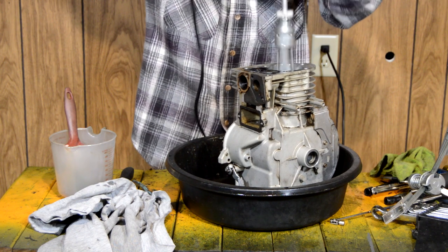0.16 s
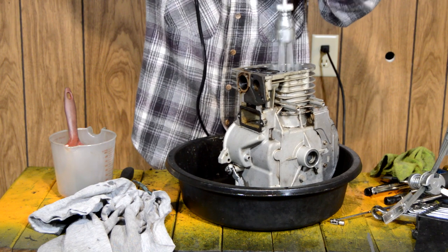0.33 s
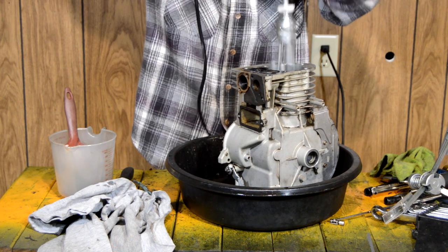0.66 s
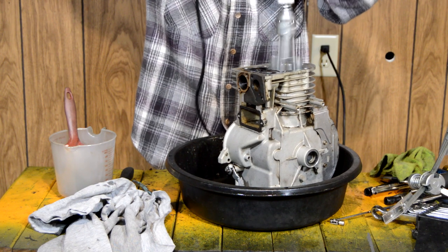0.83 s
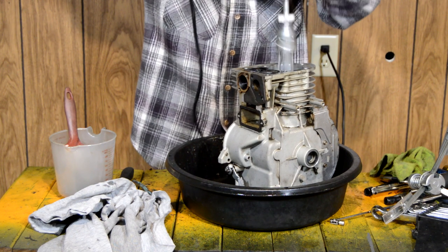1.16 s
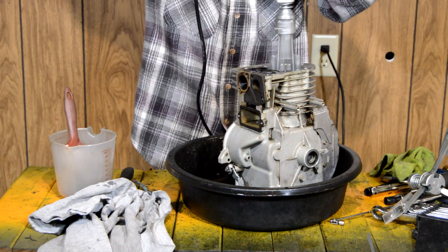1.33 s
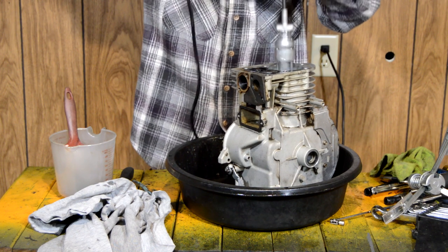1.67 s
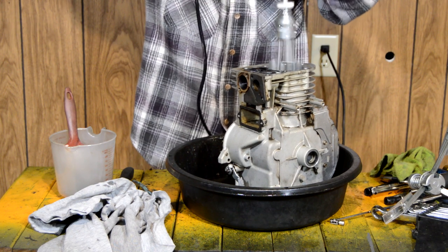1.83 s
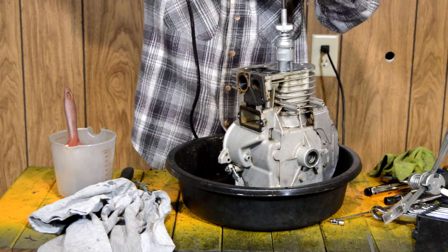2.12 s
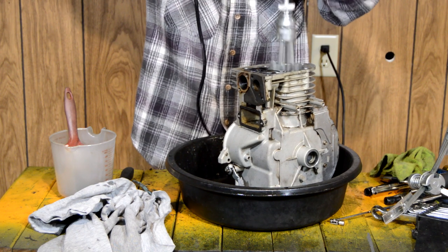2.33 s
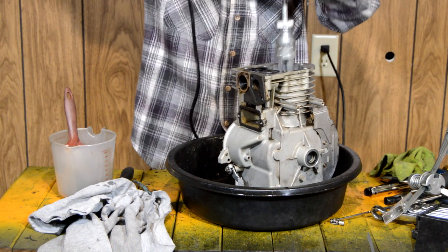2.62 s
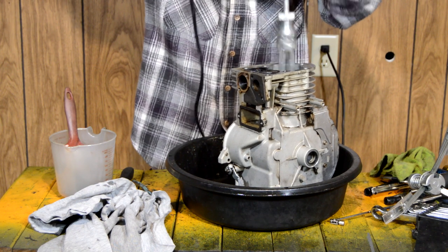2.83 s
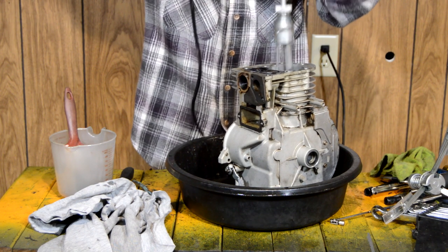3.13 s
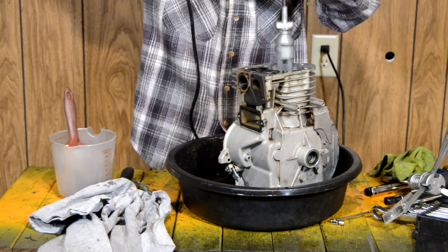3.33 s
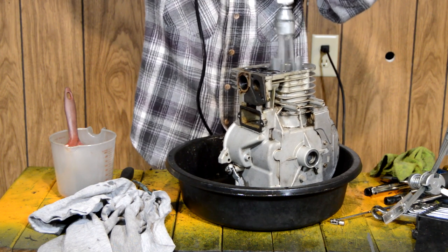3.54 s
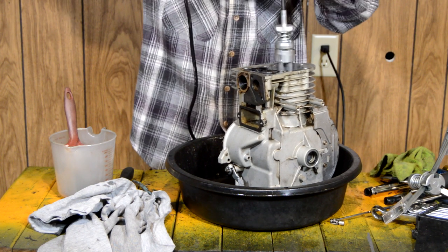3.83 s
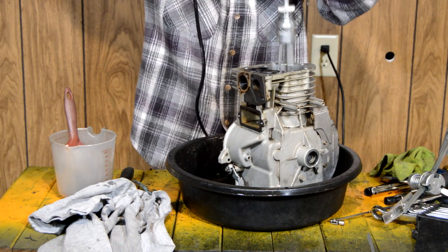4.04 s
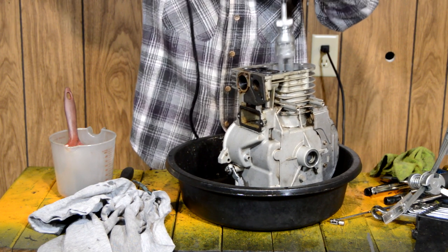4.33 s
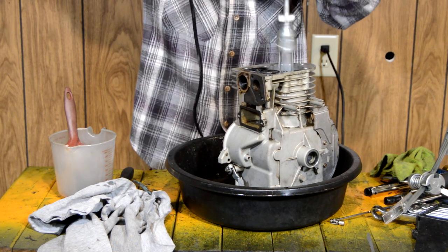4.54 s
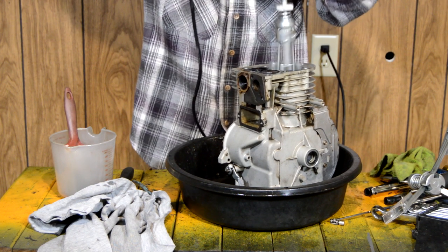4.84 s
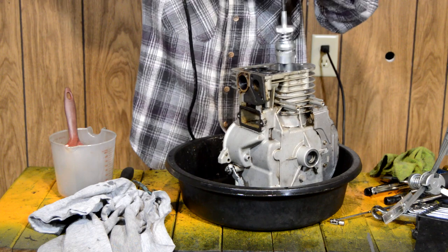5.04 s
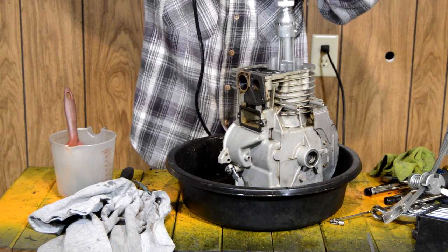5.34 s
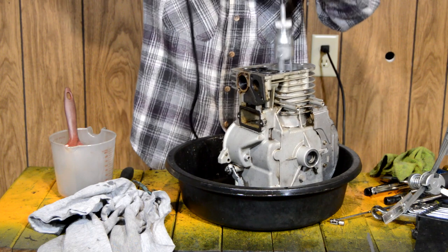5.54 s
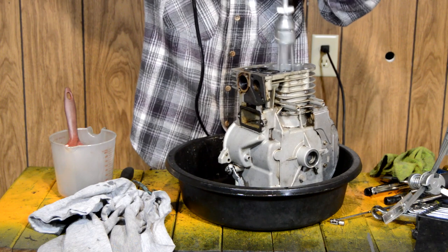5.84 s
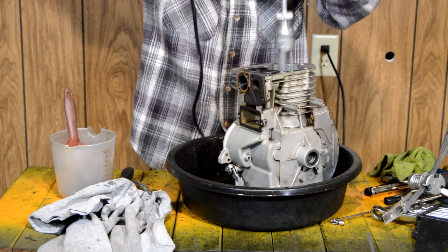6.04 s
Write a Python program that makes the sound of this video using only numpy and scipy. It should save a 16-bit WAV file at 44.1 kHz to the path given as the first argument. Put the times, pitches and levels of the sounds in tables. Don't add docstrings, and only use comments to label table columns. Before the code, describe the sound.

Steady abrasive grinding in a metal bore, hissing and ringing with each up-and-down stroke, above a chattering electric drill and low bench hum.

```python
import sys
import numpy as np
from scipy import signal
from scipy.fft import rfft, irfft
from scipy.io import wavfile
from scipy.ndimage import uniform_filter1d

SR = 44100
rng = np.random.default_rng(int(sys.argv[2]) if len(sys.argv) > 2 else 0)


def volts_from_decibels(level):
    exponent = np.asarray(level, float) / 20
    return 10 ** exponent


def unload_audio(sound):
    columns = np.transpose(np.atleast_2d(sound))
    steps = np.round(np.clip(columns, -1, 1) * 32767)
    wavfile.write(sys.argv[1], SR, steps.astype(np.int16))


N = 272582
TIME = np.arange(N) / SR
MAINS_HZ = 60.02

# f/Hz, density/dB
TABLE_SPECTRUM = [(20, -22), (36, -16), (51, -2), (63, -8), (78, 1), (88, 1), (112, -3), (128, -20),
                  (150, -36.5)]
# f/Hz, density/dB
PAN_SPECTRUM = [(105, -31), (130, -6.5), (153, -0.5), (172, -9.5), (199, 0), (230, -8), (262, -2.5),
                (281, -9), (293, -4), (312, -7.5), (348, -2.5), (390, -7.5), (430, -9.5), (480, -14),
                (560, -33.5)]
# f/Hz, density/dB
HOUSING_SPECTRUM = [(250, -43), (420, -10), (561, -5.5), (662, 2), (738, -2.5), (892, -2), (987, -10),
                    (1100, -9.5), (1430, -39.5), (2420, -120)]
# f/Hz, density/dB
GEAR_SPECTRUM = [(722, -70), (850, -23.4), (1000, -6.9), (1200, -4.9), (1450, -4.2), (1650, -2.1),
                 (1830, -3.0), (2150, 0.0), (2400, -0.9), (2650, -3.7), (2870, -4.4), (3250, -4.4),
                 (3600, -4.5), (4000, -5.7), (4700, -16.8), (5405, -70)]
# f/Hz, density/dB
SCRAPE_SPECTRUM = [(3315, -70), (3900, -28.2), (4350, -11.3), (4750, -5.5), (5250, -5.4), (5750, -5.6),
                   (6200, 0.0), (6750, -2.1), (7250, -4.1), (7600, -3.3), (8000, -5.1), (8800, -6.7),
                   (9600, -9.7), (10200, -12.7), (11500, -36.6), (13224, -70)]
# f/Hz, density/dB
FIZZ_SPECTRUM = [(7905, -70), (9300, -14.0), (10300, -2.7), (11300, -3.9), (12000, -2.1), (12600, -2.8),
                 (13400, -2.6), (14400, -2.4), (15100, -2.5), (15600, 0.0), (16000, -3.4)]
# f/Hz, width/Hz, level/dB
SHAFT_MODES = [(1103, 37, -15.1), (1286, 29, -18.3), (1640, 57, -15.3), (2209, 20, -10.0),
               (2369, 30, -17.1), (2457, 6, -11.2), (2523, 9, -14.7), (2721, 13, -16.8), (2789, 9, -21.7),
               (3068, 106, -13.2), (3460, 63, -10.7)]
# f/Hz, width/Hz, level/dB
CASTING_MODES = [(4457, 16, -25.1), (4907, 17, -16.1), (5157, 43, -19.3), (5396, 37, -21.5),
                 (5555, 39, -11.5), (5653, 33, -16.6), (5796, 29, -17.7), (5858, 27, -17.2),
                 (5931, 16, -20.5), (6048, 39, -7.9), (6108, 50, -13.7), (6314, 90, -10.8),
                 (6513, 43, -14.7), (6661, 49, -16.5), (6960, 67, -16.7), (7038, 42, -19.6),
                 (7499, 60, -17.2), (7655, 65, -13.0), (7828, 58, -15.8), (8076, 28, -18.8),
                 (8276, 47, -17.8), (8552, 57, -21.9), (9289, 58, -18.5), (9525, 60, -23.1)]
# f/Hz, width/Hz, level/dB
ARM_MODES = [(10648, 80, -17.4), (10942, 76, -16.6), (11232, 88, -15.4), (11830, 119, -13.8),
             (12134, 149, -9.5), (13643, 81, -15.5), (13885, 92, -11.0), (14399, 105, -15.7),
             (15054, 45, -16.7), (15573, 150, -14.9)]
# t/s, level/dB
SEATING = [
    (0, -1),
    (.3, 2.2),
    (2.15, 0.2),
    (2.7, 3.5),
    (3.6, 3.8),
    (3.95, 0.3),
    (5.4, 0),
    (5.75, -1),
    (6.18, -2.5),
]
# t/s, level/dB
GEAR_LOAD = [(0, 2.2), (.12, 1), (.45, -.4), (.65, 1), (.9, 0), (1.15, 0.4), (1.55, 1.1), (1.8, -.5),
             (2.1, 0), (2.6, -0.3), (3.2, -0.5), (3.5, -1), (3.7, 0.2), (4.05, -1.5), (4.45, 0.5),
             (5.15, -0.95), (5.6, 0.5), (6.18, -0.3)]
# t/s, peak level/dB, treble level/dB
JOLTS = [(0.266, -0.5, -2), (0.621, 1, -6), (0.849, -15, -2), (1.1, -3, -5), (1.437, -18, -4),
         (1.913, -16, -1), (2.003, -18, -5), (2.071, -21, -1), (2.115, -2, -5), (2.501, -5, -2),
         (2.919, -14, -4), (2.968, -25, -1), (3.101, -8, -4), (3.267, -19, -2), (3.302, -22, -2),
         (3.42, -3, 0), (3.503, -14, -1), (3.733, -18, -3), (3.834, -2, -2), (4.366, -17, -3),
         (4.451, -3.5, -6), (4.522, -16, -2), (5.536, -5, -6), (5.642, -6, -1)]
# t/s, change of pressure/dB
LEANS = [(.23, -1.4), (.39, -.9), (.07, 1.1), (.65, 0.5), (.95, -2), (1.51, -0.4), (1.64, 1.5),
         (1.83, -0.8), (2.22, 0.5), (2.41, -1), (2.55, 0), (3.05, 0.9), (3.51, -1.6), (3.65, 1.5),
         (3.86, 2.5), (4.1, -2.5), (4.27, 1.5), (4.6, -1.2), (4.86, 2.1), (5.06, 2.3), (5.25, -0.8),
         (5.63, 2), (5.82, -1.3), (6.05, 1.8)]
# t/s, length/s, fizz let out/dB
STROKES = [(0.15, 0.67, 3.5), (0.71, 0.75, 4), (1.3, 0.52, 3.5), (1.77, 0.67, 3.3), (2.34, 0.55, 2.8),
           (2.95, 0.51, 3), (3.48, 0.52, 4), (4.02, 0.54, 5), (4.41, 0.28, 4), (4.72, 0.64, 4),
           (5.28, 0.42, 2.8), (5.56, 0.75, 3), (5.9, 0.64, 4)]
# t/s, low f/Hz, high f/Hz, level/dB
SIDE_BURSTS = [
    (1.287, 13800.0, 15130.0, -35.6),
    (2.797, 10370.0, 11700.0, -39.4),
    (3.027, 10400.0, 11700.0, -37.0),
    (3.027, 14490.0, 15840.0, -36.1),
    (3.563, 13120.0, 15080.0, -33.6),
    (5.026, 11050.0, 13050.0, -33.8),
    (5.327, 7620.0, 9000, -27.9),
    (5.376, 7650.0, 9570.0, -26.5),
    (5.422, 5680.0, 6870.0, -20.5),
    (5.56, 5210.0, 6230.0, -28.0),
]


def evened(x):
    return x / np.sqrt(np.mean(x ** 2) + 1e-20)


def level_curve(rows):
    times, levels_db = np.transpose(rows)
    return np.interp(TIME, times, levels_db)


def coloured(x, spectrum):
    hz, db = np.transpose(spectrum)
    grid_hz = abs(np.fft.fftfreq(8192, 1 / SR))
    gain_db = np.interp(np.log(grid_hz + 1), np.log(hz + 1), db)
    log_gain = np.log(volts_from_decibels(np.maximum(gain_db, -70)))
    taps = np.fft.ifft(np.exp(np.conj(signal.hilbert(log_gain)))).real[:4096]
    return evened(signal.oaconvolve(x, taps)[:N])


def drift(low_hz, high_hz):
    count = 2048
    rate_hz = np.arange(count // 2 + 1) * SR / N
    weight = (rate_hz > low_hz) / (1 + (rate_hz / high_hz) ** 2)
    slow = irfft(rfft(rng.standard_normal(count)) * weight)
    return evened(np.interp(np.linspace(0, count - 1, N), np.arange(count), slow))


def grit(per_s, spread_db, swell_db):
    struck = rng.random(N) < per_s / SR
    size = np.minimum(rng.exponential(1, N), 5)
    return evened(struck * rng.standard_normal(N) * volts_from_decibels(spread_db * size + swell_db))


def ringing(drive, modes, wander_hz, wander_db):
    out = np.zeros(N)
    for hz, width_hz, db in modes:
        r = np.exp(-np.pi * width_hz / SR)
        poles = [1, -2 * r * np.cos(2 * np.pi * hz / SR), r * r]
        fed = drive * rng.choice([-1, 1], N) * volts_from_decibels(wander_db * drift(0.62, wander_hz))
        out += volts_from_decibels(db) * evened(signal.lfilter([1, 0, -1], poles, fed))
    return out


def shaded(x, tilt_db, pivot_hz, patchy_db):
    hz, t, z = signal.stft(x, SR, nperseg=512, noverlap=384)
    patches = rng.standard_normal(z.shape[::-1]).T
    for axis in (0, 0, 1, 1):
        patches = uniform_filter1d(patches, 8, axis)
    octaves = np.log2(np.clip(hz / pivot_hz, .5, 2))
    slope_db = np.outer(octaves, tilt_db[np.minimum((t * SR).astype(int), N - 1)])
    z = z * volts_from_decibels(slope_db + patchy_db * evened(patches))
    return evened(signal.istft(z, SR, nperseg=512, noverlap=384)[1][:N])


def shop(x, t60, wet_db):
    t = np.arange(SR // 4) / SR
    tail = rng.standard_normal(len(t)) * volts_from_decibels(-60 * t / t60) * (t > .004)
    wet = volts_from_decibels(wet_db) * signal.oaconvolve(x, tail / np.linalg.norm(tail))[:N]
    return (x + wet) / np.sqrt(1 + volts_from_decibels(2 * wet_db))


def bench():
    firm_db = level_curve(SEATING)
    hum = np.sqrt(2) * np.sin(2 * np.pi * 2 * MAINS_HZ * TIME)
    hum = hum * volts_from_decibels(-35 + firm_db + 1.23 * drift(2, 7.1))
    table = coloured(rng.standard_normal(N), TABLE_SPECTRUM) * volts_from_decibels(-35 + 0.36 * firm_db)
    pan = coloured(rng.standard_normal(N), PAN_SPECTRUM) * volts_from_decibels(-33 + 0.35 * firm_db)
    return hum + table + pan


def knocks():
    taps, ticks = np.zeros(N), np.zeros(N)
    for s, db, treble_db in JOLTS:
        taps[round(s * SR)] = volts_from_decibels(db)
        ticks[round(s * SR)] = volts_from_decibels(db + treble_db)
    t = np.arange(400) / SR
    dull = np.sin(2 * np.pi * 700 * t) + 0.93 * np.sin(2 * np.pi * 2300 * t)
    dull = dull * volts_from_decibels(-60 * t / .012)
    tick = np.sin(2 * np.pi * 6400 * t) * volts_from_decibels(-60 * t / .005)
    return volts_from_decibels(-7.5) * signal.oaconvolve(taps, dull)[:N] + volts_from_decibels(-21) * signal.oaconvolve(ticks, tick)[:N]


def mesh():
    mesh_hz = 661.7 + 30 * drift(.8, 6)
    turns = np.cumsum(mesh_hz) / SR
    level_db = -37.5 + 3.5 * drift(2, 15) + 1.1 * level_curve(SEATING)
    return volts_from_decibels(level_db) * np.sqrt(2) * np.sin(2 * np.pi * turns)


def pressure():
    lean_s = 0.036
    return sum(db * np.exp(-.5 * ((TIME - s) / lean_s) ** 2) for s, db in LEANS)


def height():
    return sum(db * np.cos(np.pi * np.clip((TIME - s) / length_s, -.5, .5)) ** 2
               for s, length_s, db in STROKES)


def drill(judder):
    cycles = np.floor(np.arange(N + 1) * MAINS_HZ / SR + .85)
    kicks = evened(np.diff(cycles) * volts_from_decibels(0.84 * rng.standard_normal(N)))
    load_db = level_curve(GEAR_LOAD)

    chatter = grit(per_s=7000, spread_db=1.8, swell_db=.8 * judder)
    housing = coloured(chatter + .33 * kicks, HOUSING_SPECTRUM)
    housing = shaded(housing, np.zeros(N), pivot_hz=700, patchy_db=.9)
    housing_db = -26.5 + 1.8 * load_db - 0.04 * TIME
    housing_db = housing_db + 0.16 * level_curve(SEATING)

    own_teeth = grit(per_s=10000, spread_db=1.9, swell_db=.7 * judder)
    teeth = evened(.3 * chatter + own_teeth + .1 * kicks)
    shaft = volts_from_decibels(0.6 * drift(1, 4)) * ringing(teeth, SHAFT_MODES, wander_hz=5, wander_db=1.8)
    rattle = coloured(teeth, GEAR_SPECTRUM) + shaft
    rattle = shaded(rattle, 0.47 * drift(1, 4), pivot_hz=2300, patchy_db=.9)
    rattle_db = -24 + load_db + 0.68 * pressure()
    return volts_from_decibels(housing_db) * housing + volts_from_decibels(rattle_db) * rattle


def stones(judder):
    lean_db = pressure()
    bright = -0.5 * lean_db + .8 * drift(1.5, 5.4)

    drive = grit(per_s=24000, spread_db=1.2, swell_db=.78 * judder)
    scrape = coloured(drive, SCRAPE_SPECTRUM) + ringing(drive, CASTING_MODES, wander_hz=8, wander_db=1.8)
    scrape = shaded(scrape, bright, pivot_hz=6500, patchy_db=1.1)

    fine_grit = grit(per_s=20000, spread_db=1.6, swell_db=.7 * judder + .9 * drift(6, 25))
    spray = evened(.9 * drive + fine_grit)
    fizz = coloured(spray, FIZZ_SPECTRUM) + ringing(spray, ARM_MODES, wander_hz=5, wander_db=1.5)
    fizz = shaded(fizz, np.zeros(N), pivot_hz=12000, patchy_db=.7)
    return volts_from_decibels(-16.5 + lean_db) * scrape + volts_from_decibels(-27 + lean_db + height()) * fizz


def scene():
    judder = drift(11, 45)
    background = bench() + shop(knocks(), t60=0.13, wet_db=-1.5)
    mono = background + mesh() + drill(judder) + stones(judder)
    return np.array([mono, mono])


def low_pass(x):
    return signal.sosfilt(signal.butter(12, 16720, fs=SR, output="sos"), x)


def record(dry):
    side, hz = np.zeros(N), np.fft.rfftfreq(2048, 1 / SR)
    for s, low_hz, high_hz, db in SIDE_BURSTS:
        in_band = (hz > low_hz) * (hz < high_hz)
        burst = evened(irfft(rfft(rng.standard_normal(2048)) * in_band))
        side[round(s * SR) - 1024:][:2048] += volts_from_decibels(db + 1.2) * burst * np.hanning(2048)
    driven = dry / .95
    soft = .95 * np.tanh(driven ** 3 / 3 + driven)
    edge = signal.firwin(1601, 15760, window=("kaiser", 9), fs=SR)
    limited = signal.oaconvolve(soft + np.array([side, -side]), edge[None], "same")
    return low_pass(limited)


dry = scene()
out = record(dry)
unload_audio(out)
```